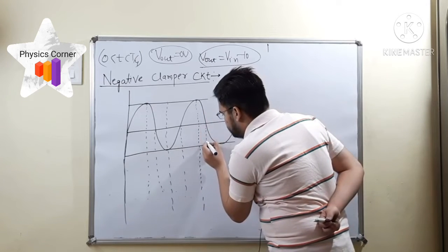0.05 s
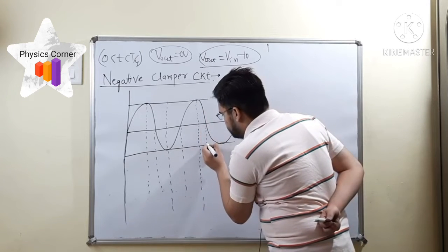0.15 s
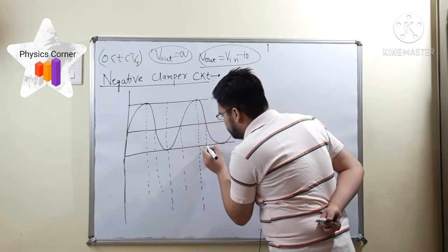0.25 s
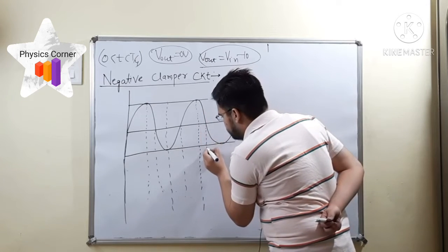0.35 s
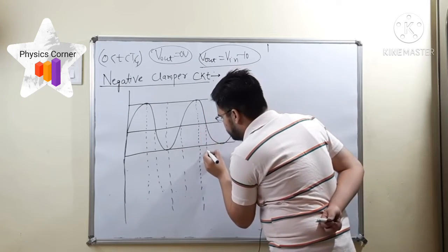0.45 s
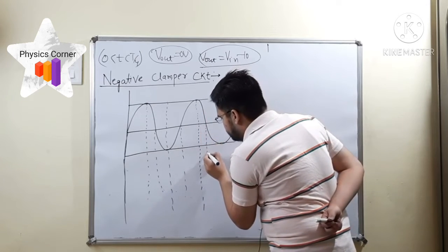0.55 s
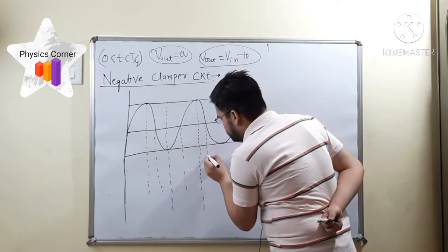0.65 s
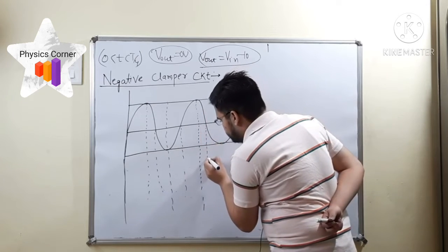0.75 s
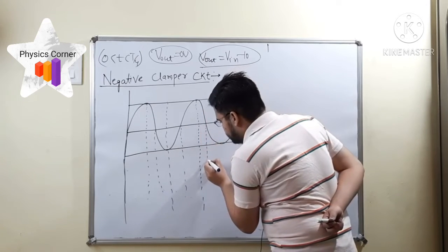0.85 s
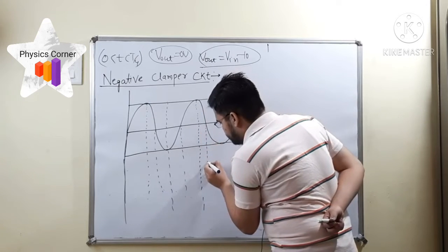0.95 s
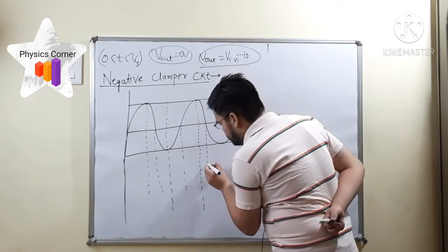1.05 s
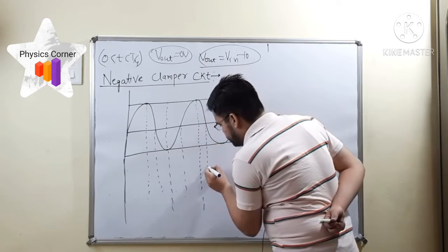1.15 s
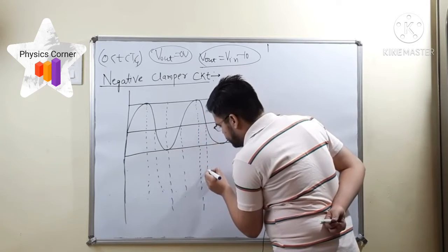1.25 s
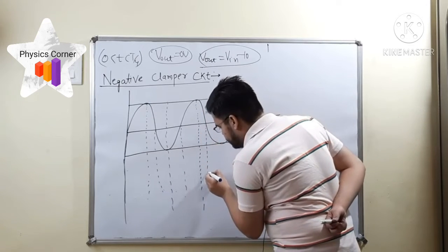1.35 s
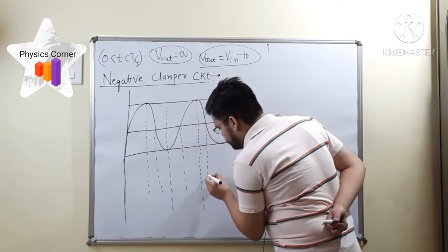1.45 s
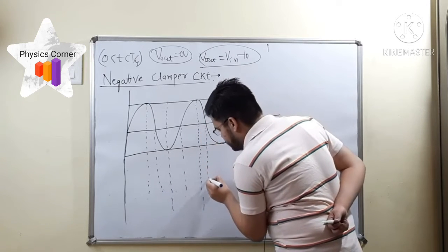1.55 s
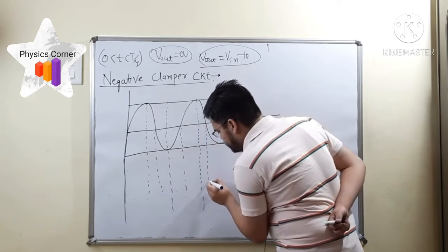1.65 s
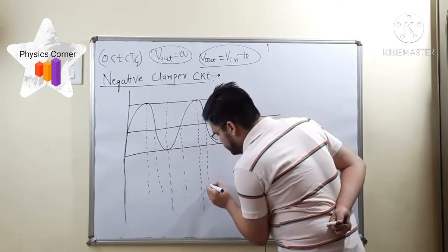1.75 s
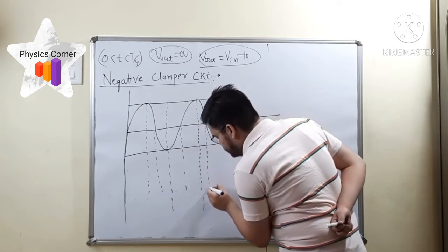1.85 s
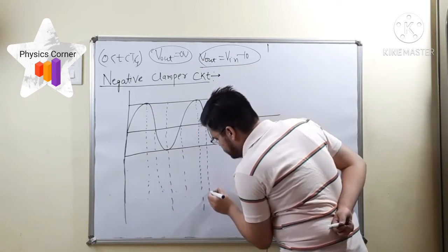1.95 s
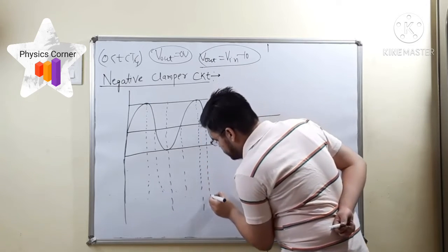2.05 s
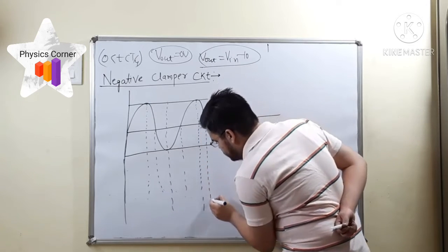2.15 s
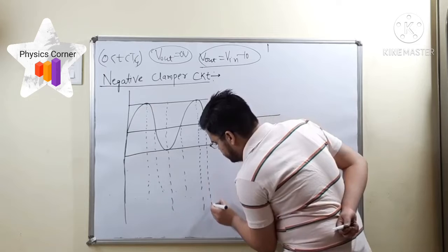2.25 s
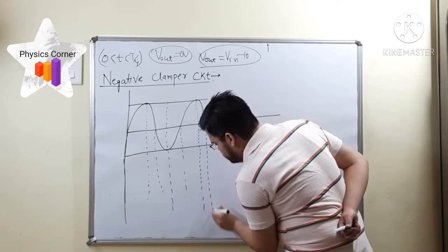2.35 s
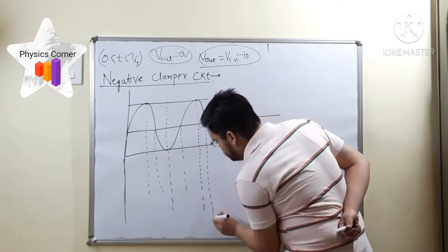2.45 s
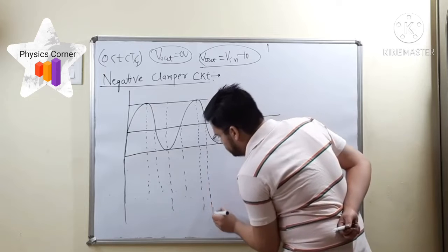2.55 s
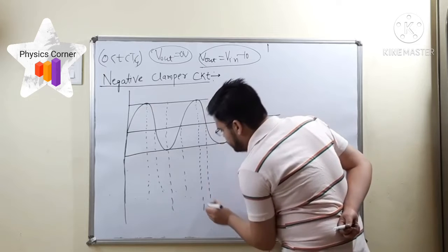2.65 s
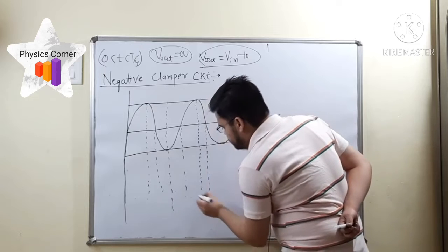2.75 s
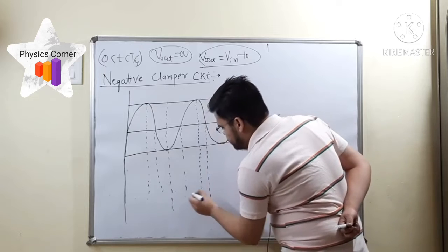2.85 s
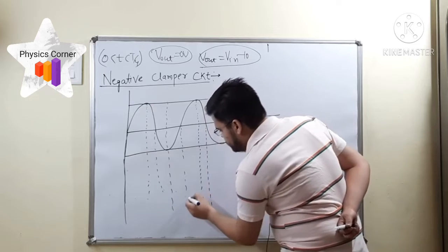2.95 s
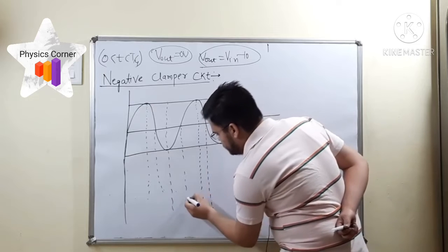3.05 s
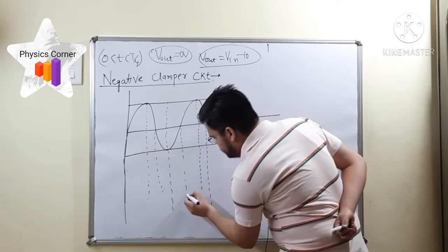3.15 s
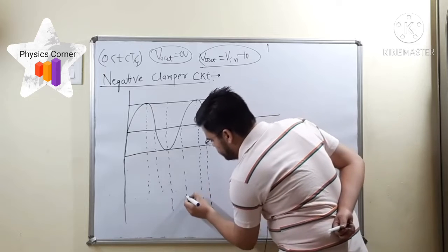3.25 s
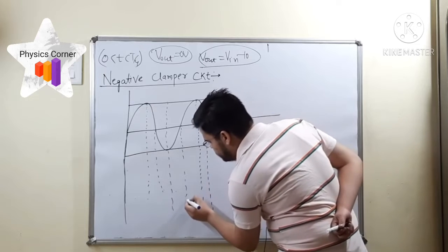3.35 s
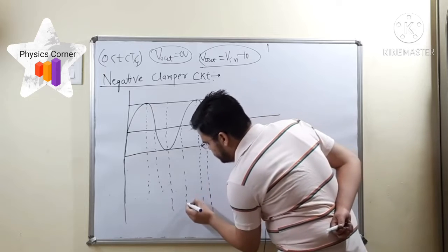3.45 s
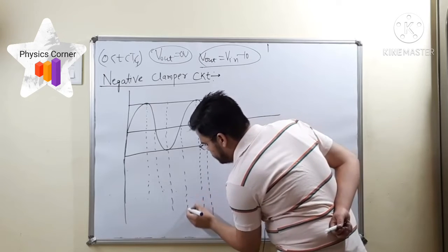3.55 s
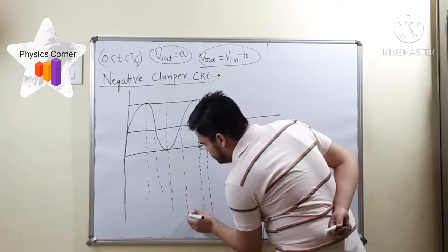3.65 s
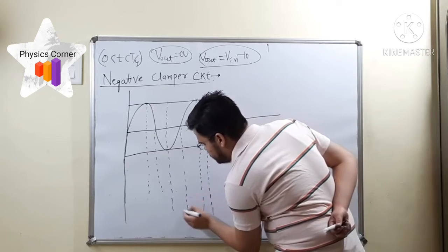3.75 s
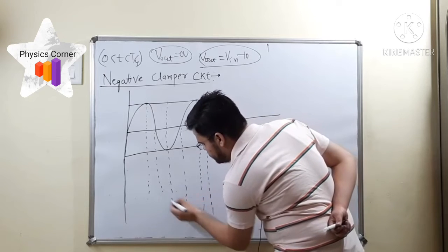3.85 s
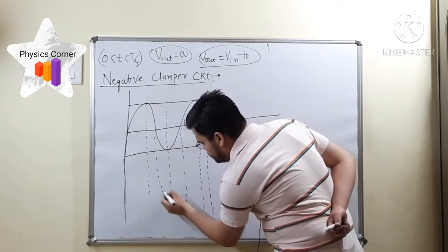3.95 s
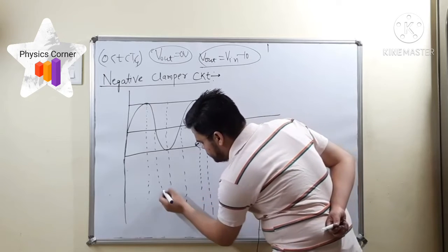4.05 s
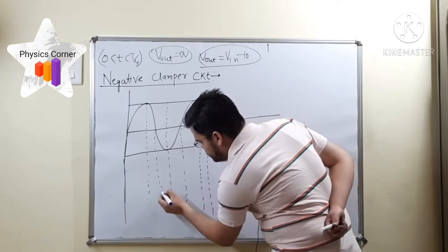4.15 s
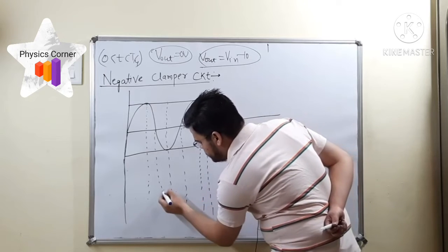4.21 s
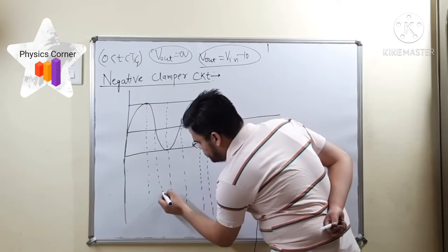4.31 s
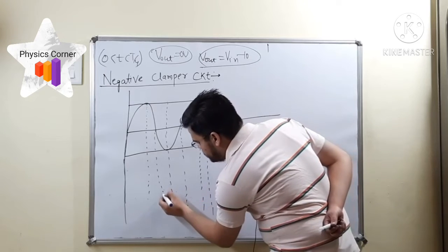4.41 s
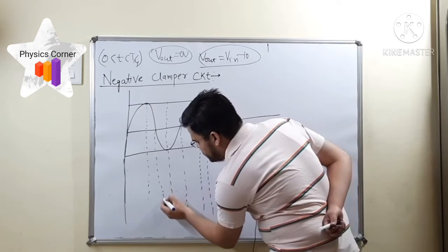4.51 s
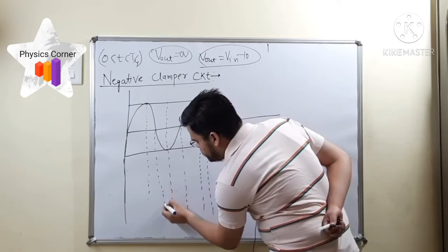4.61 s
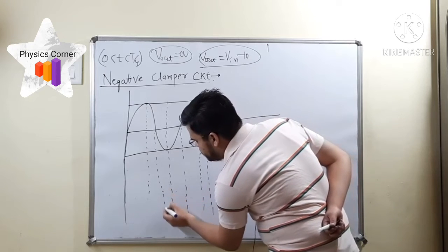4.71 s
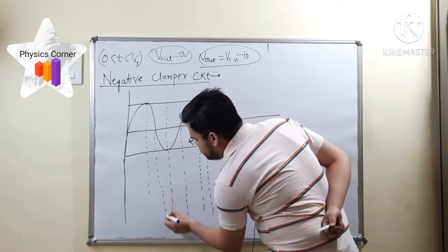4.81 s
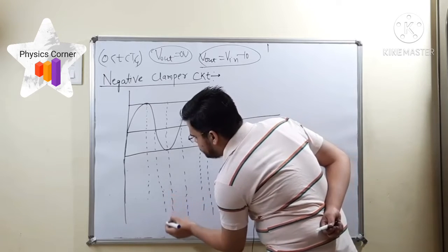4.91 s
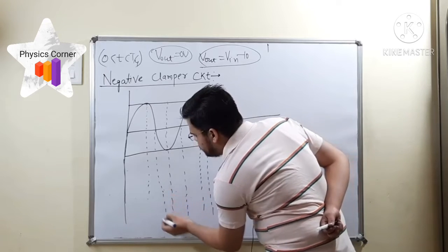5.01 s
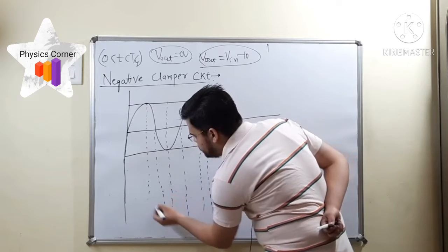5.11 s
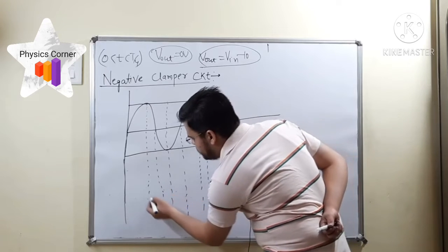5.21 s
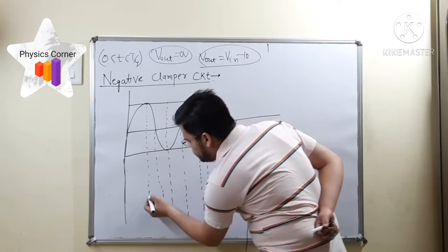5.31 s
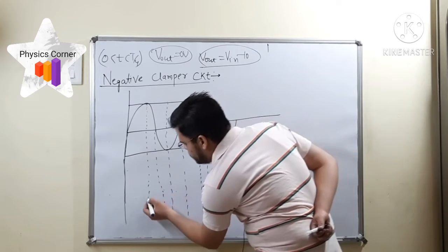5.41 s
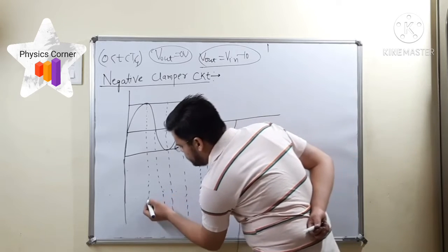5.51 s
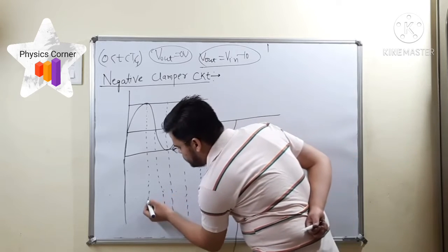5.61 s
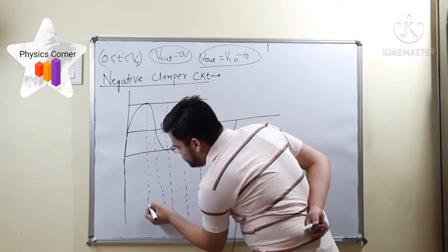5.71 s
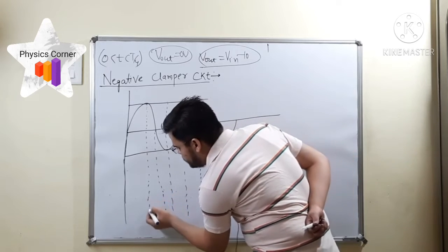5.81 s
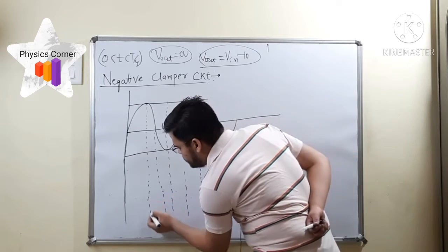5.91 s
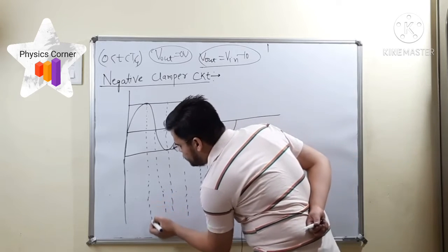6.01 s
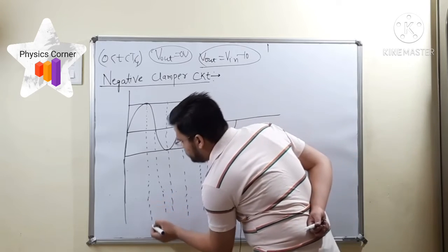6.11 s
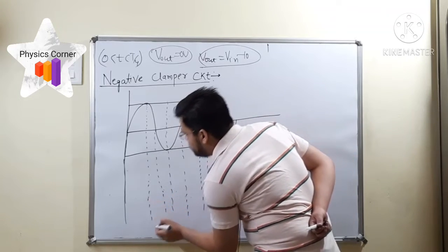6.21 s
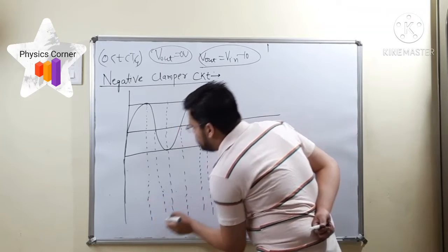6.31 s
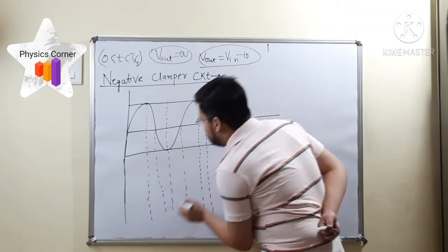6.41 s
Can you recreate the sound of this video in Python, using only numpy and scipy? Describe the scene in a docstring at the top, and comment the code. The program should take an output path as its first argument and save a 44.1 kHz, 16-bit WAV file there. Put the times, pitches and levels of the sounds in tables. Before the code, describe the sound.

Quick runs of hollow marker taps and faint squeaky slides on a wall-hung whiteboard, over a soft steady hiss.

```python
"""In a small bare room, a felt marker draws dashed lines down a whiteboard that hangs on the wall.
Each dab thumps the board and the room booms after it; then the tip slides on with a faint squeaky hiss.
A sleeve rustles as the arm moves to the next line, and the pen clicks lightly in the fingers.
Behind it all, a soft swish returns every second over a steady hiss."""
import sys
import numpy as np
from scipy import signal
from scipy.fft import rfft, irfft
from scipy.io import wavfile
from scipy.ndimage import uniform_filter1d

SR = 44100
rng = np.random.default_rng(int(sys.argv[2]) if len(sys.argv) > 2 else 0)


def persist_wave(psi):
    """Save psi, clipped to +-1, as 16-bit WAV."""
    counts = np.round(np.clip(psi, -1, 1) * 32767).astype(np.int16)
    wavfile.write(sys.argv[1], SR, np.atleast_2d(counts).T)


N = 285327
T = np.arange(N) / SR

# one dab of the marker per dash: (time [s], blow level [dB], slide length [s], slide level [dB])
DABS = [(-0.03, -26, .055, -80), (0.164, -34, .09, -80), (0.358, -40, 0.065, -77),
        (0.542, -28.5, 0.12, -75.5), (0.754, -43.5, .08, -77), (0.9629, -29, .055, -71.5),
        (1.1762, -30, 0.072, -70.5), (1.3992, -34, .077, -69), (1.5698, -39.5, 0.072, -68.5),
        (1.7557, -31, .055, -69), (1.932, -24, .058, -66), (2.0942, -23.5, 0.062, -64),
        (2.2701, -23, .032, -64.5), (2.3946, -25.5, 0.064, -61), (3.2634, -20, .052, -67.5),
        (3.4287, -21.5, 0.038, -70.5), (3.5791, -16.5, 0.037, -62.5), (3.6936, -21, 0.041, -62),
        (4.3206, -26.5, 0.027, -83), (4.503, -22, 0.05, -81), (4.6608, -22, .035, -71.5),
        (4.8093, -20.5, .035, -67), (5.6261, -27, .02, -79), (5.81, -25.5, 0.045, -76),
        (5.9605, -22.5, 0.047, -67.5), (6.066, -39.5, .03, -68)]
# where the hand is, moving down four lines: (time [s], place [0 mid-board, about 1 near the frame])
HAND_PLACE = [(0, 0.16), (1.57, 0.05), (2.1, 0.75), (2.4, 0.71), (3.26, 0.91), (3.7, 1.025), (4.32, 0.87),
              (4.5, 0.73), (4.81, 1), (5.63, 0.89), (6.07, 1.05)]


def thumps(sway_db=-8.5, sway_delay_s=0.0019, boom_delay_s=0.01108):
    """Each dab bends the board; returns the short thump and the boom that hangs on after it."""
    # A mode is a tone that a thing rings at; its ring time is how long it takes to fade by 60 dB.
    # The next three tables: (pitch [Hz], ring time [s], mid-board level [dB], gain near the frame [dB])
    bending_modes = [(106, 0.062, -14.5, 3), (133.3, 0.077, -1.5, -13.5), (252.2, 0.058, 12, -0.5),
                     (255, 0.026, 5, 8), (370, 0.077, -16, 17), (400, 0.048, -11.5, 13),
                     (581, 0.024, -28.5, 17.5), (792, 0.044, -29.5, 5.5)]  # the board flexing
    sway_modes = [(35.1, 0.71, -30, 3), (54.4, 0.038, -16.5, 12.5), (76, 0.36, -10.5, -6.5),
                  (124.3, 0.37, -18, 2.5)]  # the whole board rocking slowly on its hooks
    boom_modes = [(133.8, 0.6, -17.5, -11), (190, 0.29, -32.5, 9), (214.3, 0.3, -25, 8.5),
                  (236.6, 0.97, -18.5, -0.5), (269, 0.81, -18, -3.5), (299.7, 1.12, -26.5, -5.5),
                  (342.2, 0.71, -24, 3.5), (393.2, 1.28, -39.5, 9), (460, 0.75, -33, 3.5),
                  (507, 0.14, -39, -5), (563, 1.04, -46.5, 11.5)]  # air ringing between the board and the walls
    # waves that the frame throws back upside down: (delay [s], share of the wave [0 to 1])
    frame_echoes = [(.0109, 0.33), (0.0202, 0.092)]
    # how freely the board gives: (time [s], sway gain [dB], gain of the two lowest bending modes [dB])
    board_give = [(.5, 9.5, -7), (1.2, 7.5, -1), (1.9, 4.5, 5), (3.3, -1, 0), (4.7, 5, -16),
                  (5.6, 7.5, 3.5), (5.95, 11.5, 12)]
    felt_hz, middling_db = 270.5, -29.5  # the felt's cutoff for a middling blow at mid-board
    octaves_per_db, octaves_at_frame = 0.04, 0.63  # felt firms up under hard blows and on stiff spots
    t = T[:int(1.2 * SR)]
    thump, boom = np.zeros((2, N))
    for s, blow_db, _, _ in DABS:
        place = at_time(HAND_PLACE, s)
        cutoff_hz = felt_hz * 2 ** (octaves_per_db * (blow_db - middling_db) + octaves_at_frame * place)
        low = amp(at_time(board_give, s, column=2)) * struck(bending_modes[:2], place, t[:SR // 5])
        high = struck(bending_modes[2:], place, t[:SR // 5])
        bend = amp(blow_db) * cushioned(low + high, cutoff_hz)
        add(thump, s, bend)
        for delay, share in frame_echoes:
            add(thump, s + delay, -share * bend)
        sway = cushioned(struck(sway_modes, place, t), cutoff_hz)
        add(boom, s + sway_delay_s, amp(blow_db + at_time(board_give, s) + sway_db) * sway)
        air = cushioned(struck(boom_modes, place, t), cutoff_hz)
        add(boom, s + boom_delay_s, amp(blow_db) * air)
    return thump, boom


def struck(modes, place, t, scatter_db=1.2):
    """One blow rings fading tones; neighbours swing opposite ways, so the sound takes a moment to swell."""
    chance_db = scatter_db * rng.uniform(-1, 1, len(modes))  # no two dabs are quite alike
    out = np.zeros(len(t))
    for k, (hz, ring_s, db, frame_db) in enumerate(modes):
        tone = np.sin(2 * np.pi * hz * t) * amp(-60 * t / ring_s)
        out += (-1) ** k * amp(db + place * frame_db + chance_db[k]) * tone
    return out


def cushioned(x, cutoff_hz):
    """The felt tip spreads the blow over time, so a soft dab rings only the low tones."""
    return signal.lfilter(*signal.butter(3, cutoff_hz, fs=SR), x)


def touches(knock_db=-38, swing_db=13, tick_db=-21.0, tick_fade_s=0.0065, lag_s=0.00097):
    """The tip meets the glossy board with a woody knock and a tiny tick, louder after a pause."""
    # short high tones: (pitch [Hz], ring time [s], mid-board level [dB], gain near the frame [dB])
    knock_modes = [(665, 0.066, -2.5, 4.5), (890, 0.035, -9.5, 4), (1240, 0.011, -4, -1)]
    no_swing_s, full_swing_s = 0.23, 0.75  # after a longer pause the pen swings in from farther away
    out, t = np.zeros(N), T[:4096]
    previous_s = DABS[0][0]
    for s, blow_db, _, _ in DABS:
        swing = np.clip((s - previous_s - no_swing_s) / (full_swing_s - no_swing_s), 0, 1)
        tick = noise(resonant([(5170, 4100, 0)]), len(t)) * np.exp(-t / tick_fade_s)
        knock = struck(knock_modes, at_time(HAND_PLACE, s), t)
        add(out, s + lag_s, amp(blow_db + knock_db + swing_db * swing) * (knock + amp(tick_db) * tick))
        previous_s = s
    return out


def slides(gain_db=1.0, rough_db=2.0, scrape_db=-6.5, grip_s=0.0033, lift_sharpness=6.0):
    """The felt grips, then sticks and slips in tiny jerks that make the tip squeak until it lifts off."""
    # where the tip rings: (pitch [times the squeak pitch], width [Hz], level [dB])
    tip_peaks = [(1, 740, 4.5), (1.17, 600, -2.5), (1.39, 1000, -5), (1.52, 600, -7), (1.73, 855, -2),
                 (2.0, 1200, -8)]
    # the squeak drops down the first line, then holds: (time [s], pitch [Hz])
    squeak_pitch = [(.75, 7300), (.96, 6300), (2.1, 5700), (3.6, 5700)]
    out, t = np.zeros(N), T[:8192]
    for s, _, length_s, db in DABS:
        squeak_hz = at_time(squeak_pitch, s)
        peaks = [(ratio * squeak_hz, width, peak_db) for ratio, width, peak_db in tip_peaks]
        squeak = noise(resonant(peaks), len(t))
        scrape = amp(scrape_db) * noise(resonant([(3420, 9100, 0)]), len(t))
        pressure = np.minimum(t / grip_s, 1) * np.exp(-(t / length_s) ** lift_sharpness)
        jerks = flutter(len(t), rough_db, grain_samples=60)
        add(out, s, amp(db + gain_db) * (squeak + scrape) * pressure * jerks)
    return out


def sleeve(rough_db=1.2):
    """Cloth brushes over cloth in smooth swells, some brighter than others."""
    # one row a brush: (peak time [s], rise [s], fall [s], level [dB], brightness [dB per octave])
    brushes = [(2.535, 0.035, 0.08, -59.5, 3.5), (3.98, 0.094, 0.098, -64, .3),
               (5.175, .04, 0.15, -58.5, 0.7), (5.208, 0.02, 0.027, -56, -0.5),
               (5.372, 0.026, 0.021, -49.5, 2), (5.43, 0.024, 0.051, -60, 0.5)]
    # the tone colour of rubbing cloth: (frequency [Hz], relative level [dB])
    cloth_colour = [(200, 4.5), (600, 4.5), (2000, -1), (4500, -2), (8000, -7), (11200, -4), (13500, -16),
                    (16000, -44)]
    out, t = np.zeros(N), T[:SR] - 0.5  # one second, with the peak in the middle
    for s, rise, fall, db, brightness in brushes:
        speed = np.exp(-0.5 * (t / np.where(t < 0, rise, fall)) ** 2)
        rub = noise(lambda hz: amp(at_frequency(cloth_colour, hz) + brightness * np.log2(hz + 300)), SR)
        add(out, s - 0.5, amp(db) * speed * rub * flutter(SR, rough_db, grain_samples=120))
    return out


def pen_clicks():
    """The pen barrel shifts in the fingers, each time with a tiny burst of noise."""
    # one row a click: (time [s], level over the first 10 ms [dB], pitch [Hz], width [Hz], fade [s])
    shifts = [(1.358, -68, 7000, 1300, 0.0065), (5.315, -49.5, 880, 800, 0.0047),
              (5.383, -54, 3540, 6000, 0.004), (5.614, -66, 7150, 1690, 0.015),
              (5.779, -64, 6250, 3480, 0.0021)]
    out, t = np.zeros(N), T[:4096]
    for s, db, hz, width, fade_s in shifts:
        click = noise(resonant([(hz, width, 0)]), len(t)) * np.exp(-t / fade_s)
        add(out, s, amp(db) * click / click[:SR // 100].std())
    return out


def room(x, gap_s=0.016):
    """Echoes off the bare walls blur into one tail, in which the highest sounds fade first."""
    # how long the room rings: (frequency [Hz], time to fade by 60 dB [s])
    ring_times = [(60, 0.55), (250, 0.9), (500, 0.91), (2000, 0.76), (10000, 0.27)]
    hz, t, bands = signal.stft(rng.standard_normal(SR), SR, nperseg=512)
    fade = amp(-60 * t / at_frequency(ring_times, hz)[:, None])
    _, tail = signal.istft(bands * fade, SR, nperseg=512)
    echoes = np.zeros(N)
    add(echoes, gap_s, signal.fftconvolve(x, tail / np.linalg.norm(tail))[:N])
    return echoes


def swish(level_db=-61.5, alternate_db=0.5, first_s=-0.037, period_s=1.0):
    """A soft swish once a second, weaker and stronger in turn, perhaps the works of a wall clock."""
    # where the swish rings: (pitch [Hz], width [Hz], relative level [dB])
    swish_peaks = [(816, 91, 9), (965, 75, 4.5), (1150, 91, 2.5), (1560, 790, -2.5), (1940, 140, -4),
                   (2444, 200, -2), (2850, 410, -3.5), (3450, 200, -9)]
    rise_s, hold_s, fade_s = 0.02, 0.051, 0.13
    loudness = np.zeros(N)
    for k, s in enumerate(np.arange(first_s, T[-1], period_s)):
        rise = np.clip((T - s) / rise_s, 0, 1)
        fade = np.exp(-np.maximum(T - s - hold_s, 0) / fade_s)
        loudness += amp(level_db - (-1) ** k * alternate_db) * rise * fade
    return loudness * noise(resonant(swish_peaks), N)


def hiss(treble_db=-66.78, drift_db=1.0):
    """Room rumble and microphone hiss drift gently; the part above 1 kHz sets their level."""
    # the tone colour of rumble and hiss: (frequency [Hz], relative level [dB])
    hiss_colour = [(12, -13), (25, -0.5), (70, -1), (100, 0.5), (125, -13), (170, -3), (210, -14.5),
                   (330, -15), (500, -19), (900, -23.5), (2000, -28), (5000, -31.5), (11500, -34.5),
                   (15400, -38.5)]
    # a slow dip and rise: (time [s], gain [dB])
    swell = [(0, 1.5), (1.6, 0.8), (4.6, -0.5), (6.4, 3)]
    air = noise(lambda hz: amp(at_frequency(hiss_colour, hz)), N)
    treble = signal.sosfilt(signal.butter(4, 1000, "high", fs=SR, output="sos"), air)
    drift = flutter(N, drift_db, grain_samples=12000)
    return amp(treble_db + at_time(swell, T)) * air / treble.std() * drift


def amp(db):
    """Turns decibels into a number to multiply by."""
    return 10 ** (np.asarray(db) / 20)


def evened(x):
    """Scales a signal to an average strength (rms) of 1."""
    return x / np.sqrt(np.mean(x ** 2) + 1e-20)


def at_time(points, s, column=1):
    """Looks up a table's value at time s, sliding smoothly between rows."""
    columns = np.transpose(points)
    return np.interp(s, columns[0], columns[column])


def at_frequency(points, hz):
    """Looks up a table's value at a frequency, sliding between rows octave by octave."""
    row_hz, values = np.transpose(points)
    return np.interp(np.log(hz + 1), np.log(row_hz + 1), values)


def add(mix, s, sound):
    """Mixes a sound in at time s, which may lie before zero."""
    start = round(s * SR)
    sound = sound[max(-start, 0):]
    part = mix[max(start, 0):][:len(sound)]
    part += sound[:len(part)]


def noise(colour, size):
    """Noise of strength 1; the function colour(hz) says how much of each frequency it holds."""
    spectrum = rfft(rng.standard_normal(size)) * colour(np.fft.rfftfreq(size, 1 / SR))
    return evened(irfft(spectrum, size))


def resonant(peaks):
    """A tone colour made of steep-sided peaks: (pitch [Hz], width [Hz], level [dB])."""
    return lambda f: np.sqrt(sum((amp(db) / (1 + ((f - hz) / (width / 2)) ** 2)) ** 2
                                 for hz, width, db in peaks))


def flutter(size, depth_db, grain_samples):
    """A loudness that wobbles at random; longer grains make it slower."""
    wobble = evened(uniform_filter1d(rng.standard_normal(size), grain_samples))
    return evened(amp(depth_db * wobble))


def scene(thump_db=-0.02, thump_echo_db=-14.0, small_echo_db=-16.0):
    """Board, pen and sleeve sound in the room, over the swish and the hiss."""
    thump, boom = thumps()
    small_sounds = slides() + touches() + pen_clicks() + sleeve()
    board = amp(thump_db) * thump + boom + amp(thump_echo_db) * room(thump)
    return (board + small_sounds + amp(small_echo_db) * room(small_sounds) + swish() + hiss())[None]


def record(dry, cutoff_hz=15500):
    """The recorder cuts off the very highest treble."""
    lowpass = signal.firwin(511, cutoff_hz, window=("kaiser", 9), fs=SR)
    return signal.oaconvolve(dry, lowpass[None], "same")


dry = scene()
out = record(dry)
persist_wave(out)
```